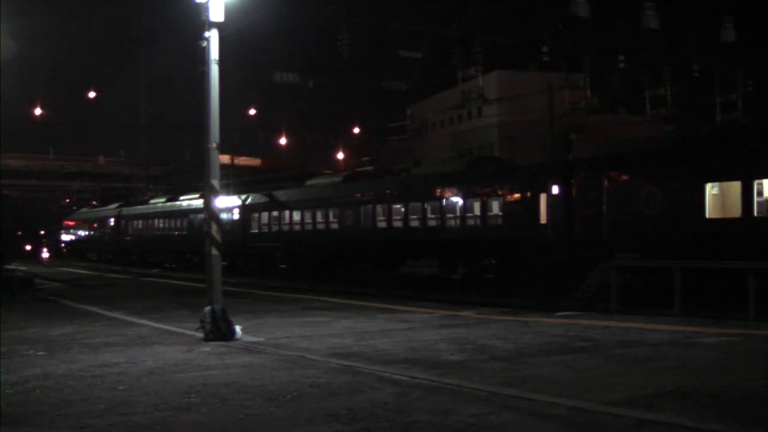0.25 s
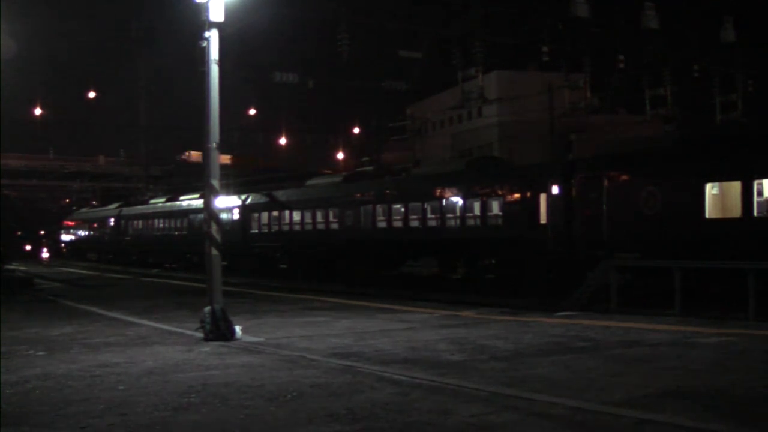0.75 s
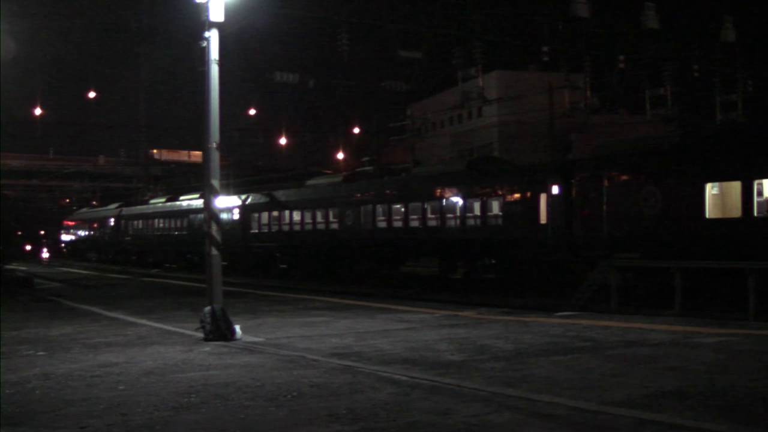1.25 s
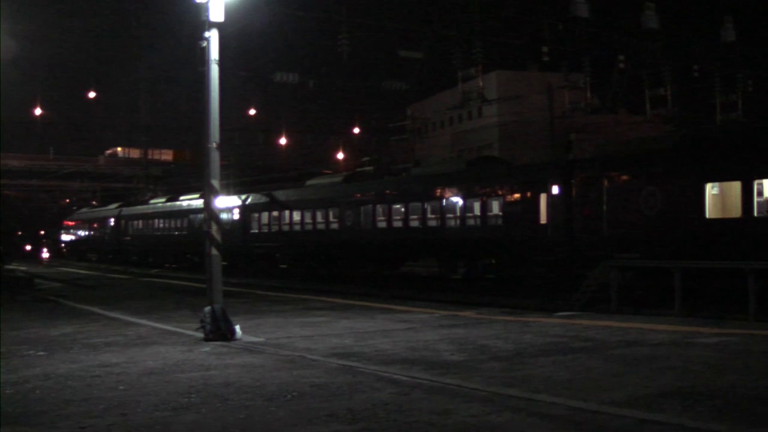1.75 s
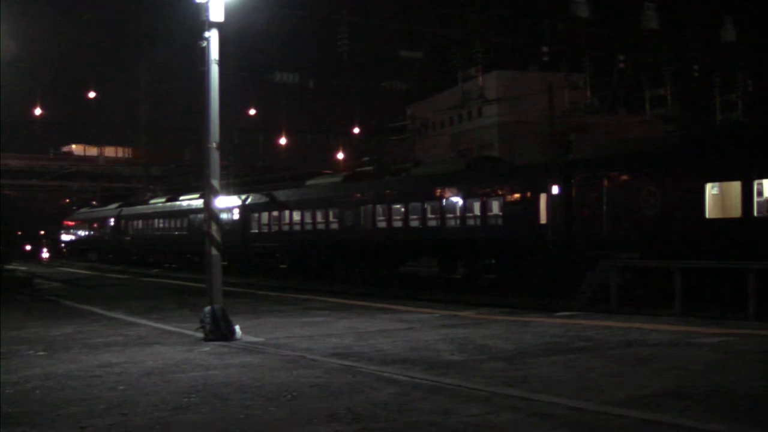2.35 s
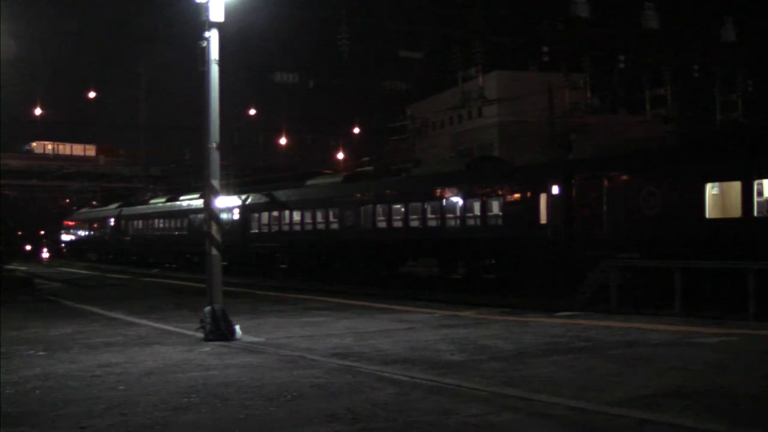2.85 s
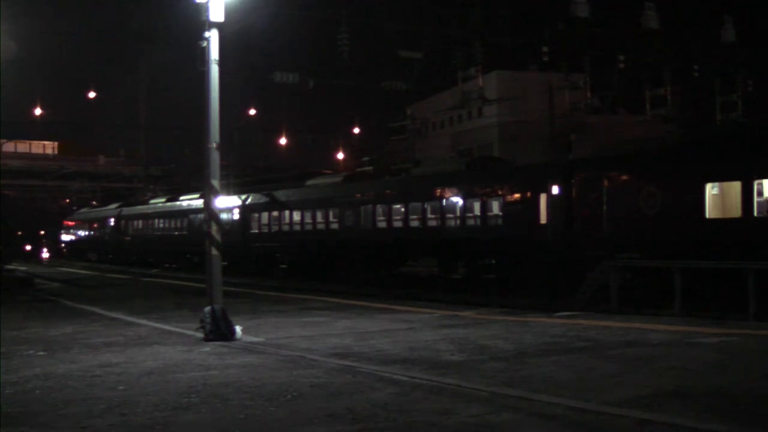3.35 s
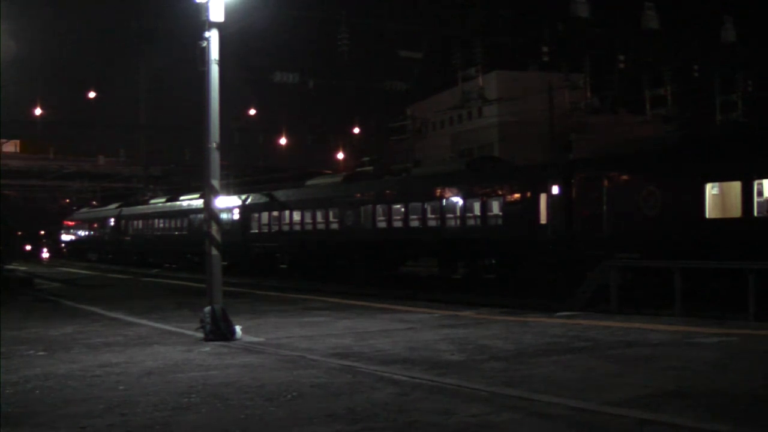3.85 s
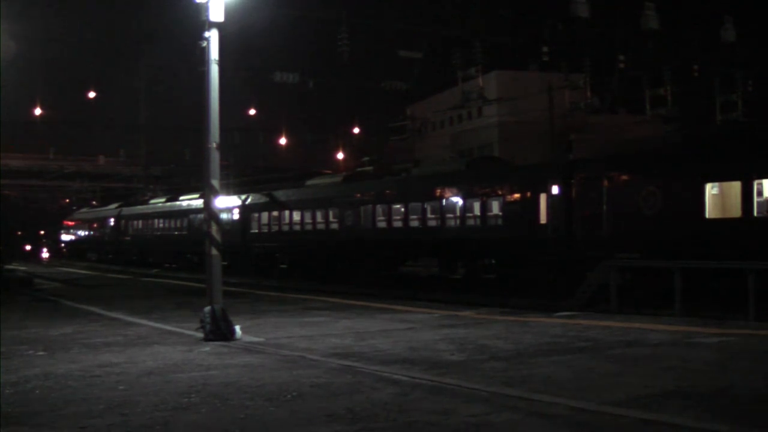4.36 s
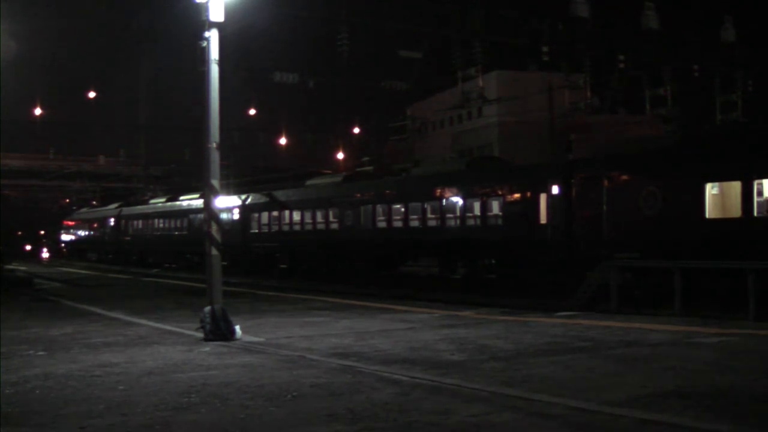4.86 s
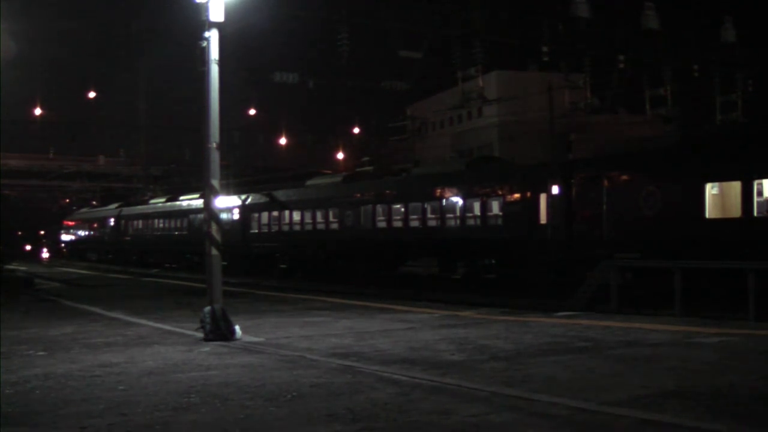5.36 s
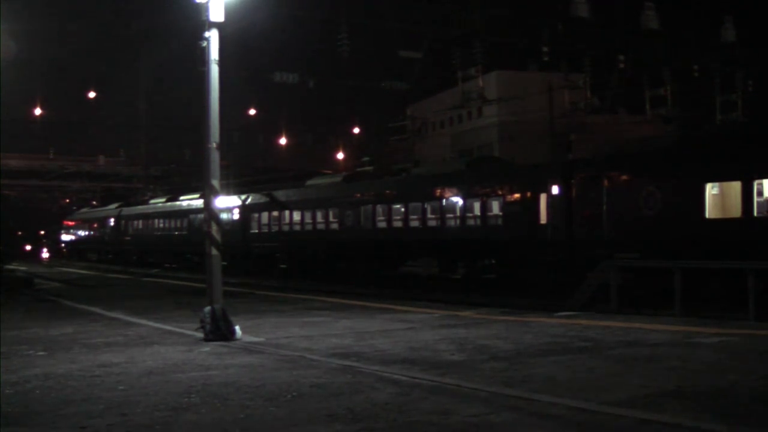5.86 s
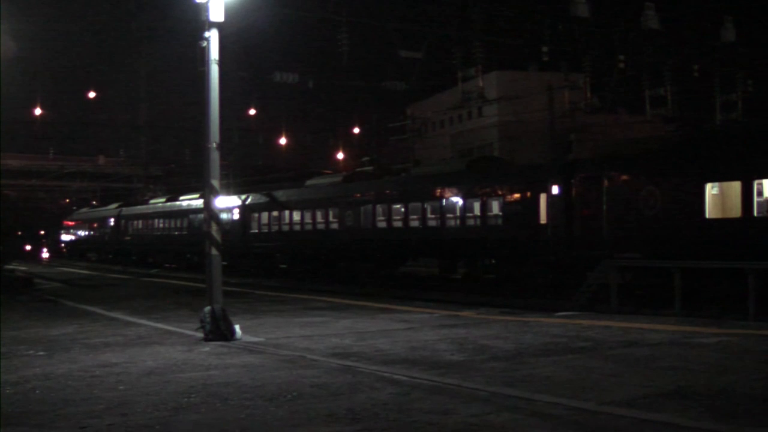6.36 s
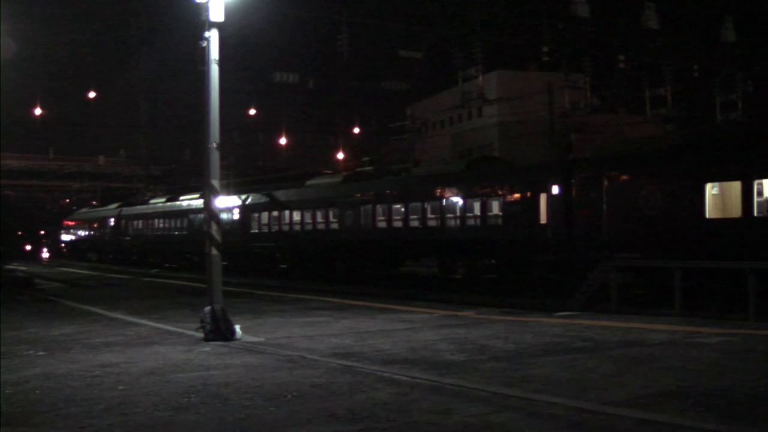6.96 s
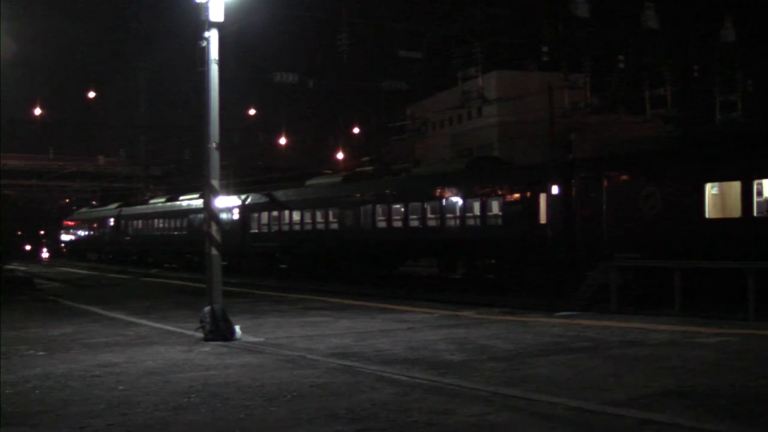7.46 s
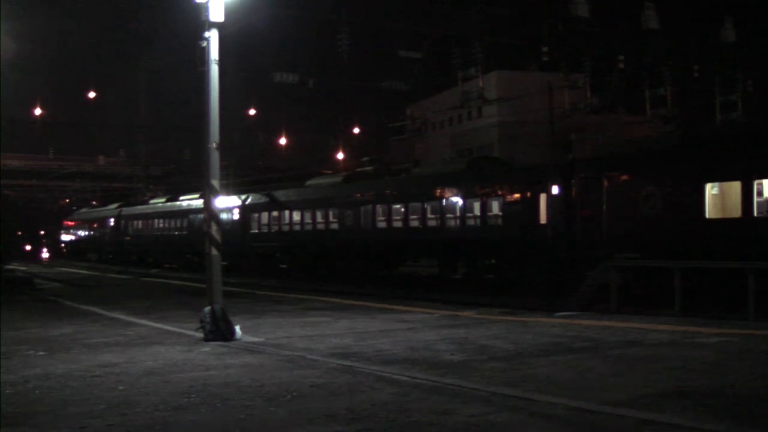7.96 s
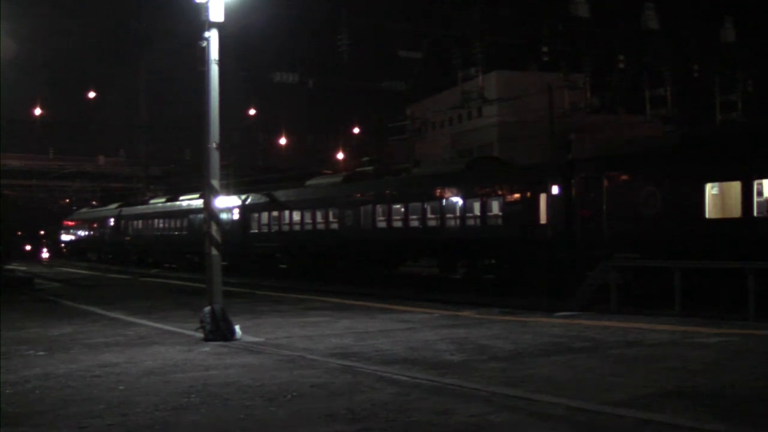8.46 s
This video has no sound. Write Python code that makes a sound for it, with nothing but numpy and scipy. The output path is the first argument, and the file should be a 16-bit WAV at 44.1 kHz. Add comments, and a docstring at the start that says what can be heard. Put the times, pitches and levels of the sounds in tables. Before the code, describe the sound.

Outdoors at night in a rail yard, a train's ventilation fans rumble with a low electrical hum that throbs early, then strengthens by three seconds. A thin whine and faint crackling sizzle sit above. After four seconds loose steel gear knocks in uneven clusters, the busiest past seven seconds, with a dull echo. A distant, nearly mono microphone with faint hiss.

```python
"""Fan rumble swells, its bass still growing, over a hum that throbs early and then strengthens; knocks echo.
A distant elevated train passes at night: flutter-banded noise makes the fans, wavering sines the hum and whine,
sparse impulses through high resonances the faint sizzle. Loose running gear knocks in clusters, rattle plus thud
through steel-coloured pulses, with a noise tail for the echo; a few small dry ticks sound close by."""
import sys
import numpy as np
from scipy import signal
from scipy.fft import rfft, irfft, next_fast_len
from scipy.io import wavfile
from scipy.ndimage import uniform_filter1d

SR = 44100
rng = np.random.default_rng(int(sys.argv[2]) if len(sys.argv) > 2 else 0)


def master(y):
    """Save y as 16-bit WAV."""
    cut = np.clip(np.atleast_2d(y).T, -1, 1)
    pcm = np.round(cut * 32767)  # scale
    wavfile.write(sys.argv[1], SR, pcm.astype(np.int16))


N = 383669
TIME = np.arange(N) / SR
OPPOSED = np.array([[1], [-1]])  # left, right


def undb(db):
    """Decibels to amplitude gain."""
    return 10 ** (np.asarray(db) / 20)


def level(x, db):
    """Scale to an rms level."""
    return x * undb(db) / np.sqrt(np.mean(x ** 2))


def ramp(start_s, length_s):
    """Rise evenly from 0 to 1 and stay there."""
    return np.clip((TIME - start_s) / length_s, 0, 1)


def add(track, start_s, sound):
    """Mix a sound into a track in place."""
    start = int(start_s * SR)
    track[start:start + len(sound)] += sound[:N - start]


def shape_db(points, hz):
    """Interpolate a spectrum on a log-frequency axis."""
    at_hz, db = np.transpose(points)
    return np.interp(np.log(hz + 1), np.log(at_hz), db)


def noise(points):
    """Gaussian noise of unit rms, shaped to a spectrum."""
    size = next_fast_len(N, True)
    hz = np.fft.rfftfreq(size, 1 / SR)
    spectrum = rfft(rng.standard_normal(size)) * undb(shape_db(points, hz))
    return level(irfft(spectrum)[:N], 0)


def walk(rate_hz):
    """Random steps held 1 / rate_hz s, smoothed twice, unit rms."""
    hold = max(int(SR / rate_hz), 2)
    steps = np.repeat(rng.standard_normal(N // hold + 1), hold)
    slewed = uniform_filter1d(uniform_filter1d(steps, hold), hold)
    return level(slewed[:N], 0)


def resonate(x, hz, width_hz):
    """Two-pole resonance, gain 1 at the centre."""
    b, a = signal.iirpeak(hz, hz / width_hz, fs=SR)
    return signal.lfilter(b, a, x)


def tone(hz, wander_hz, flutter_db, rate_hz):
    """Sine of unit rms whose pitch and level waver on the way through the air."""
    phase = 2 * np.pi * np.cumsum(hz + wander_hz * walk(rate_hz)) / SR
    return level(np.sin(phase) * undb(flutter_db * walk(rate_hz)), 0)


def blow(points, tilt_db_per_octave, size=4096):
    """Minimum-phase pulse of peak 1: a spectrum, tilted between 100 and 2000 Hz."""
    hz = np.fft.rfftfreq(size, 1 / SR)
    target_db = shape_db(points, hz) + tilt_db_per_octave * np.log2(np.clip(hz, 100, 2000))
    # folding the cepstrum makes the pulse causal
    cepstrum = irfft(np.log(undb(target_db)))
    cepstrum[1:size // 2] *= 2
    cepstrum[size // 2 + 1:] = 0
    pulse = irfft(np.exp(rfft(cepstrum)))
    return pulse / np.abs(pulse).max()


def rattle(rise_s):
    """Burst of tiny contacts, unit energy: noise that peaks at rise_s and dies away."""
    t = TIME[:SR // 4]
    burst = rng.standard_normal(len(t)) * np.sqrt(t) * np.exp(-t / (2 * rise_s))
    return burst / np.linalg.norm(burst)


def fans():
    """Turbulent duct air: bands up to 1600 Hz flutter separately, the lowest grows most, all swell once."""
    # fan rumble: f/Hz, relative density/dB per Hz
    rumble_spectrum = [(20, -25.5), (36, -18.5), (60, -10), (130, -1), (260, -1.5), (340, -3), (720, -3),
                       (850, -6.5), (970, -14), (1500, -23.5), (1700, -29), (2200, -32), (3000, -42.5),
                       (5200, -74.5)]
    low_db, high_db = -30.5, -27.5
    bass_offset_db, bass_db_per_s = -1, 0.43  # relative, before the overall level is set

    rest = noise(rumble_spectrum)
    air = 0
    for k, edge_hz in enumerate(100 * 2 ** np.arange(5)):
        lowpass = signal.butter(2, edge_hz, fs=SR, output="sos")
        band = signal.sosfiltfilt(lowpass, rest)
        build_db = (bass_offset_db + bass_db_per_s * TIME) * 0.5 ** k  # halves with each higher band
        air = air + band * undb(0.66 * walk(11) + build_db)
        rest = rest - band
    airflow_db = low_db + (high_db - low_db) * ramp(start_s=0.99, length_s=1.7)
    return level(air + rest, 0) * undb(airflow_db)


def hum():
    """Transformer cores buzz at harmonics of twice the mains rate; fan motors add lines of drifting level."""
    # fan motor lines: f/Hz, drift from level/dB, drift to level/dB, wander/Hz
    motor_lines = [(117.8, -57, -46, .8), (225.7, -47.5, -41.5, 0.33), (231.5, -45.5, -44, 1.5),
                   (236.2, -58, -35.5, 0.16), (299.4, -57, -51, .4), (720, -51, -53, 2.5)]
    # early throbs of the third harmonic: crest t/s, level/dB, half length to 1/e/s
    throb_crests = [(0.436, -34.5, 0.072), (0.845, -36, 0.089), (1.16, -34.5, .065), (1.44, -32.5, 0.049),
                    (1.694, -37.5, 0.12)]
    hum_hz = 120
    first_db, second_low_db, second_high_db, third_db = -45, -43, -36.5, -50

    second_db = second_low_db + (second_high_db - second_low_db) * ramp(start_s=1.9, length_s=0.85)
    throbs = 0
    for crest_s, db, half_s in throb_crests:
        throbs = throbs + undb(db) * np.exp(-((TIME - crest_s) / half_s) ** 2)
    gains = [undb(first_db), undb(second_db), np.hypot(undb(third_db), throbs)]

    out = np.zeros(N)
    for k, gain in enumerate(gains, 1):
        out += gain * tone(k * hum_hz, wander_hz=0.058, flutter_db=0.1, rate_hz=3.3)
    for hz, from_db, to_db, wander_hz in motor_lines:
        gain = undb(np.linspace(from_db, to_db, N))
        out += gain * tone(hz, wander_hz, flutter_db=1.5, rate_hz=4)
    return out


def whine():
    """Thin converter tones, a touch to the left; those above 1800 Hz differ between the channels."""
    # converter tones: f/Hz, level/dB
    converter_lines = [(1314, -62), (1499, -62.5), (1580, -71), (1862, -73.5), (1948, -69), (1971, -64.5),
                       (1999.7, -64), (2038, -75), (2080, -72.5), (2128, -72.5), (2157, -72.5),
                       (2278, -73.5), (2500, -76), (2519, -74), (2587, -76.5), (2627.4, -63.5), (2738, -75),
                       (2999.5, -85.5), (3273, -80.5), (3499.5, -81.5)]
    mid, side = np.zeros(N), np.zeros(N)
    for hz, db in converter_lines:
        mid += undb(db) * tone(hz, wander_hz=1.5, flutter_db=1.0, rate_hz=10)
        if hz > 1800:
            side += undb(db) * np.sin(2 * np.pi * (hz * TIME + rng.random()))
    return mid + (undb(-10.5) * side + undb(-20.5) * mid) * OPPOSED


def sizzle_ring(drive):
    """The few high resonances that every discharge excites."""
    # resonances: f/Hz, nominal width/Hz (scaled by 0.58 below), relative gain/dB
    resonances = [(3100, 650, -9), (3790, 170, 1), (4143, 180, 0.5), (4540, 500, -10)]
    rings = 0
    for k, (hz, width_hz, db) in enumerate(resonances):
        sign = (-1) ** k  # opposite neighbours fill the valleys between them
        rings = rings + sign * undb(db) * resonate(drive, hz, 0.58 * width_hz)
    bandpass = signal.butter(4, (2900, 4650), "band", fs=SR, output="sos")
    return signal.sosfilt(bandpass, rings)


def sizzle():
    """Flurries of tiny discharges, likeliest at the mains crest, over a fizz; a few stronger ones snap."""
    # strongest discharges: t/s, peak/dB
    strong_snaps = [(.5498, -48), (1.0003, -48), (1.334, -48), (1.7611, -50), (2.3283, -49), (3.0192, -50),
                    (3.0711, -47), (3.77, -47), (4.664, -49), (4.8645, -51), (5.4651, -49), (6.8724, -48)]
    mains = np.cos(2 * np.pi * 60 * TIME)
    sparks_per_s = 48 * undb(3 * walk(9)) * (1 + 0.3 * mains)
    spark_gain = undb(3.4 * np.clip(rng.standard_normal(N), -2, 1.2))
    sparks = (rng.random(N) < sparks_per_s / SR) * spark_gain
    fizz = rng.standard_normal(N) * undb(1.3 * mains + 0.6 * walk(40))
    drive = level(sparks, -1.8) + level(fizz, 0)
    out = level(sizzle_ring(drive), -65.5)

    snap = sizzle_ring(signal.unit_impulse(SR // 20))
    snap /= np.abs(snap).max()
    for start_s, db in strong_snaps:
        add(out, start_s, undb(db) * snap)
    return out


def ticks():
    """A small hard part clicks dryly: each contact has a brief chatter and its own treble limit."""
    # ticks: t/s, peak/dB, top of the band f/Hz
    tick_events = [(7.6243, -41, 4300), (7.634, -46, 4700), (7.735, -35.5, 4400), (7.853, -35, 4150)]
    # their one broad resonance: f/Hz, relative density/dB per Hz
    tick_spectrum = [(1500, -49.5), (2700, -21), (3100, -3.5), (3800, -3), (4150, -4.5), (4600, -12),
                     (5400, -44), (9000, -74.5)]
    out = np.zeros(N)
    for start_s, db, top_hz in tick_events:
        contact = undb(-0.5) * rattle(rise_s=0.00081)
        contact[0] += 1
        click = signal.fftconvolve(contact, blow(tick_spectrum, 0))
        lowpass = signal.butter(8, top_hz, fs=SR, output="sos")
        click = signal.sosfilt(lowpass, click)
        add(out, start_s, undb(db) * click / np.abs(click).max())
    return out


def strike(tilt_db, rise_s, rattle_db, ring_hz):
    """One contact: loose steel rattles, a dull thud lands at the crest, and the struck spot rings."""
    # what a knock rings with: f/Hz, relative density/dB per Hz
    steel_spectrum = [(20, -22), (60, -0.5), (170, 1.5), (330, 3), (700, -5.5), (1100, -14), (1450, -26.5),
                      (1900, -37.5), (2400, -53.5), (6000, -86.5)]
    rattle_tilt_db = 2.1  # dB per octave brighter than the thud
    ring_db, ring_q = 3.5, 4.5

    thud = blow(steel_spectrum, tilt_db)
    out = signal.fftconvolve(rattle(rise_s), blow(steel_spectrum, tilt_db + rattle_tilt_db))
    out *= undb(rattle_db) * np.linalg.norm(thud) / np.linalg.norm(out)
    add(out, rise_s, thud)
    return out + undb(ring_db) * resonate(out, ring_hz, ring_hz / ring_q)


def diffuse_echo(x, top_hz, t60_s):
    """Dull diffuse echo: low-passed sound through a decaying noise tail of unit energy."""
    t = TIME[:SR]
    tail = rng.standard_normal(SR) * undb(-60 * t / t60_s) * (1 - np.exp(-t / 0.02))
    lowpass = signal.butter(2, top_hz, fs=SR, output="sos")
    dull = signal.sosfilt(lowpass, x)
    return signal.fftconvolve(dull, tail / np.linalg.norm(tail))[:N]


def knocks():
    """Loose gear strikes in uneven clusters and rings its body; a low echo tail follows."""
    # knocks: thud t/s, thud peak before ringing/dB, tilt/dB per octave, rattle rise/s,
    # rattle energy against the thud/dB, ring of the struck spot f/Hz
    knock_events = [(4.2967, -17.5, -1, 0.0051, 5, 330), (4.315, -18.5, .5, 0.0072, 10.5, 165),
                    (4.33, -20.5, 3, 0.0048, 8, 1080), (4.335, -20.5, -3.5, 0.0058, 7.5, 190),
                    (4.3455, -17, -1, 0.0028, -6, 400), (4.4341, -7, 1, 0.0016, -9, 660),
                    (4.438, -9.5, 2, 0.0031, 1, 290), (4.447, -13.5, -2, 0.0023, 3, 450),
                    (4.4583, -12.5, -4, 0.0019, -7, 260), (4.4745, -15.5, -0.5, 0.0037, 1, 603),
                    (4.482, -12.5, -1, 0.0026, -2.5, 480), (4.508, -15, 0, 0.003, 0.5, 780),
                    (4.529, -22.5, -2.5, .012, 10.5, 179), (4.5516, -12, -1, 0.0022, -7, 420),
                    (4.789, -20.5, -3, .005, 1.5, 160), (4.881, -18.5, 2.5, 0.0047, 1.5, 210),
                    (4.967, -19.5, -3, 0.0026, 0.5, 197), (5.003, -18, 1, 0.0014, -7, 332),
                    (5.824, -12.5, -1.5, .0025, -2.5, 330), (5.828, -15.5, -.5, .002, -3.5, 870),
                    (5.845, -17, -2.5, 0.0039, -0.5, 205), (5.865, -19, -2, 0.0037, 1, 560),
                    (5.882, -19.5, -4.5, 0.0039, 2, 240), (5.8987, -20.5, -4, 0.0032, 1, 300),
                    (6.802, -18, -5, .004, 0, 220), (6.852, -21, -1, 0.0022, -3, 200),
                    (6.957, -17, -1, 0.00298, 1, 720), (6.986, -18.5, -1.5, 0.0026, -5, 150),
                    (7.195, -15.5, -2.5, .0041, 1, 200), (7.2142, -13, -3.5, 0.0039, 1.5, 290),
                    (7.225, -17.5, 3.5, 0.0039, 4.5, 420), (7.249, -13.5, -3.5, 0.0049, 1.5, 250),
                    (7.2726, -10, -3.5, 0.0024, -6, 140), (7.278, -5.5, -1.5, 0.0024, -6.5, 166),
                    (7.285, -13.5, 3.5, 0.0052, 4.5, 420), (7.294, -12.5, -.5, 0.0051, 3, 65),
                    (7.307, -15, -1, 0.0055, 0.5, 398), (7.322, -13, 0.5, 0.0035, -3, 290),
                    (7.33, -24, -1.5, .025, 11.5, 560), (7.3445, -13, 3.5, 0.0024, -4, 260),
                    (7.359, -18, 4.5, 0.0037, 1, 874), (7.3668, -14.5, 7, 0.00403, 3.5, 616),
                    (7.387, -16.5, 1, .004, 1.5, 790), (7.402, -15.5, -2.5, 0.004, -4, 80),
                    (7.448, -22.5, -3.5, .012, 7, 238), (7.6238, -16, -2, 0.0085, 3.5, 130),
                    (7.641, -16, -2, 0.0039, 0.5, 200), (7.73, -20.5, -5.5, 0.0029, -9, 260),
                    (7.939, -18, -3.5, .003, -7, 160), (8.24, -18, -3, 0.0074, 3.5, 110)]
    # body modes: f/Hz, width/Hz, gain/dB
    body_modes = [(166, 100, -6), (615, 270, -13.5)]
    gear = np.zeros(N)
    for thud_s, db, tilt_db, rise_s, rattle_db, ring_hz in knock_events:
        add(gear, thud_s - rise_s, undb(db) * strike(tilt_db, rise_s, rattle_db, ring_hz))
    gear = gear + sum(undb(db) * resonate(gear, hz, width_hz) for hz, width_hz, db in body_modes)
    echo = undb(-10.5) * diffuse_echo(gear, top_hz=840, t60_s=0.92)
    boom = undb(-3) * diffuse_echo(gear, top_hz=80, t60_s=0.51)
    return gear + echo + boom


def scene():
    """The train is distant: all but the whine is identical left and right."""
    return fans() + hum() + whine() + sizzle() + ticks() + knocks()


def record(dry):
    """The recorder adds faint hiss and cuts the top."""
    # hiss alike in both channels: f/Hz, relative density/dB per Hz
    hiss_mid_spectrum = [(1000, -2), (5000, 2.5), (7500, 0.5), (9500, -4.5), (14500, -4), (15700, -19.5)]
    # hiss opposed between the channels: f/Hz, relative density/dB per Hz
    hiss_side_spectrum = [(500, -27.5), (2200, 7), (4400, -0.5), (5000, 0), (6800, -2), (8300, 8),
                          (9400, 11.5), (10300, 5), (11500, -4), (14500, -16), (15700, -21.5)]
    hiss = undb(-72.5) * noise(hiss_mid_spectrum) + undb(-60.5) * noise(hiss_side_spectrum) * OPPOSED
    top_cut = signal.ellip(8, 0.2, 70, 15700, fs=SR, output="sos")  # ripple dB, stop dB, edge Hz
    return signal.sosfilt(top_cut, dry + hiss)


dry = scene()
out = record(dry)
master(out)
```